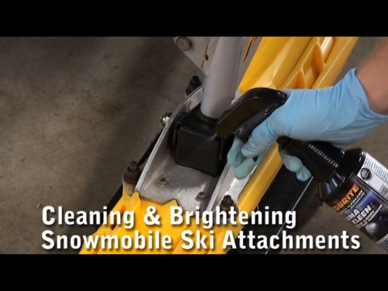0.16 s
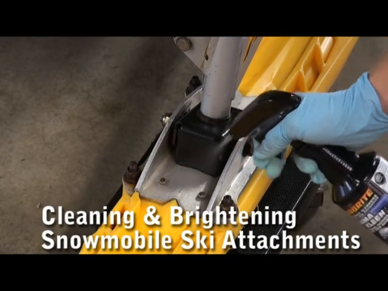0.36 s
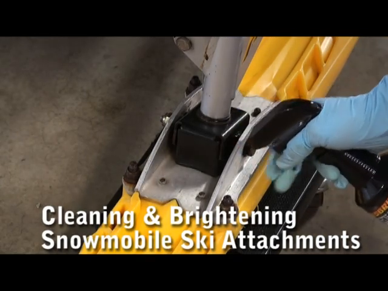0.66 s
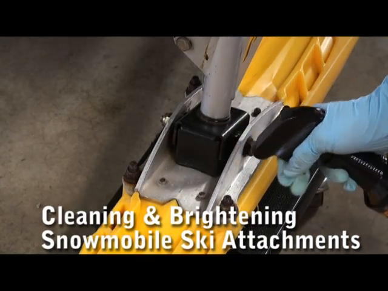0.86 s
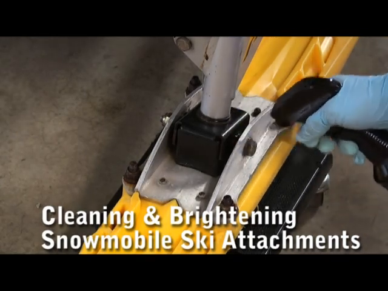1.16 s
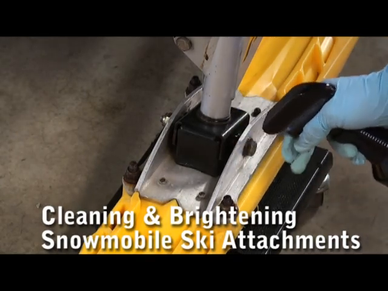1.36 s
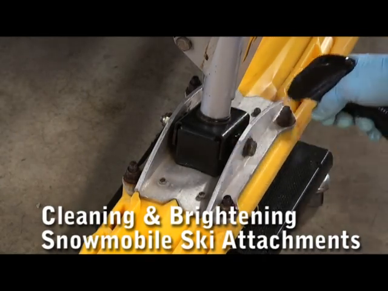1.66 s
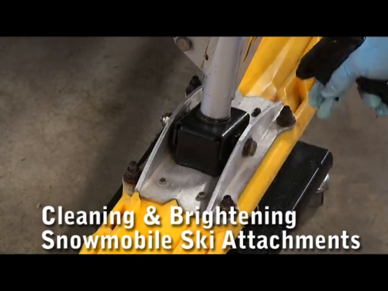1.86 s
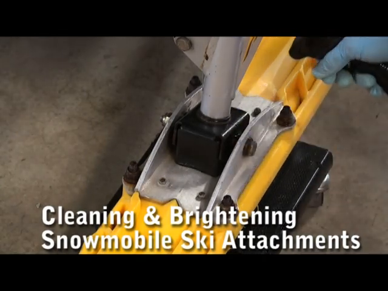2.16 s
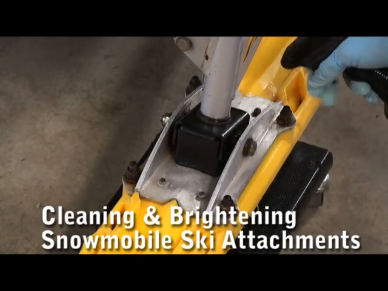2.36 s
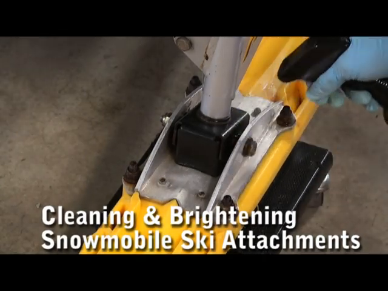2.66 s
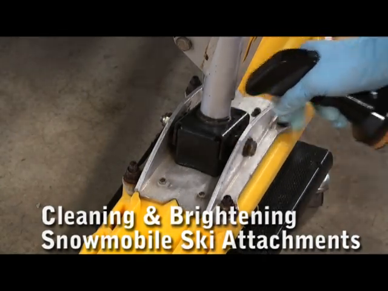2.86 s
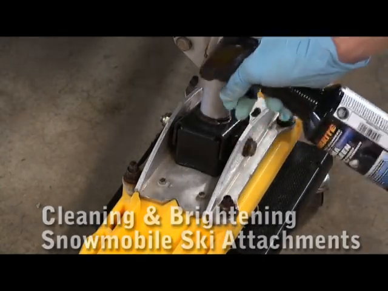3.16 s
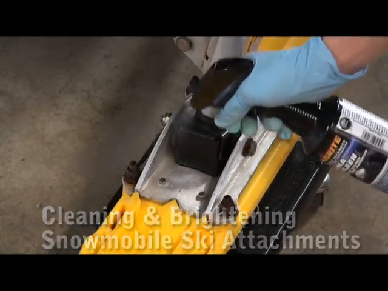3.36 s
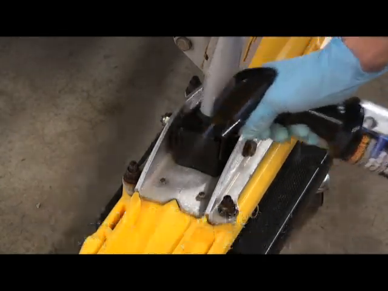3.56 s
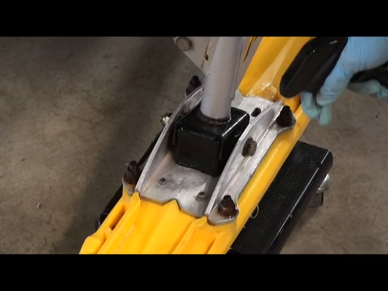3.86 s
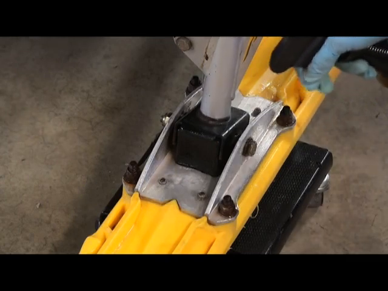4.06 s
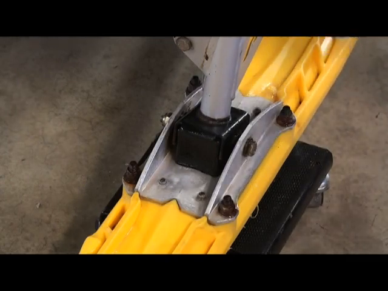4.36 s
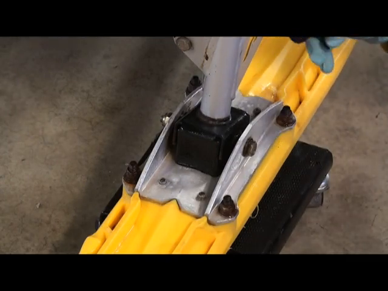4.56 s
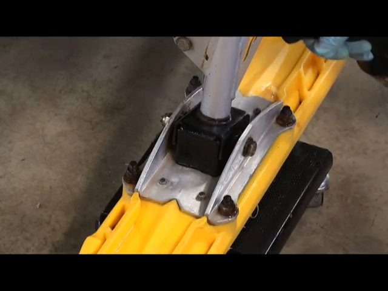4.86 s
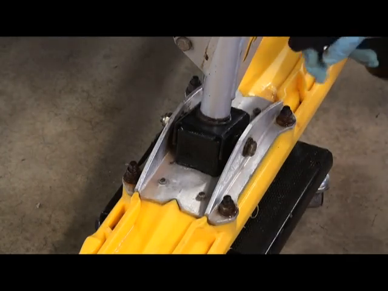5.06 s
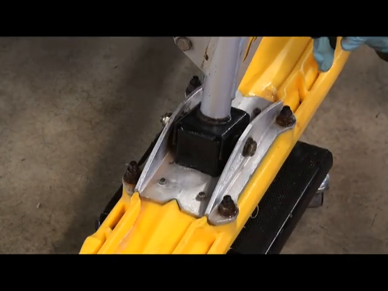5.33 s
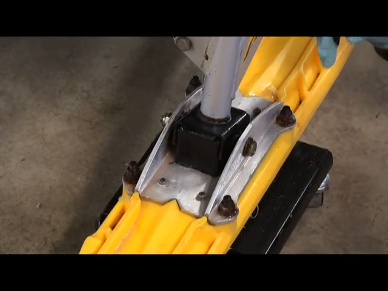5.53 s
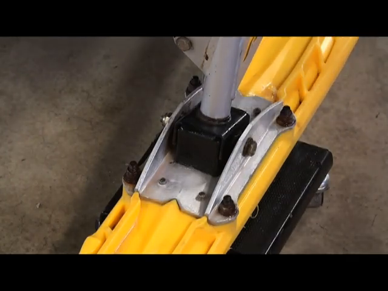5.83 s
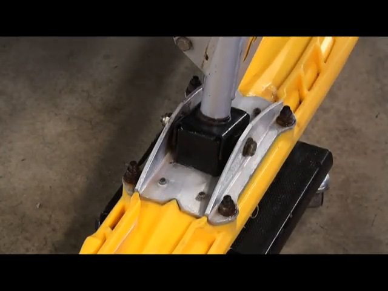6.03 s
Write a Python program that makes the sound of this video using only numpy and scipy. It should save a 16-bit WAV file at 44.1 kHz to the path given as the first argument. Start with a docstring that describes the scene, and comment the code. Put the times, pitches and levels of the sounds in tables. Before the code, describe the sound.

A trigger spray bottle is pumped close to the microphone in a quiet workshop. From the very start until about 5 seconds come nine short squeezes, roughly half a second to a second apart. Each is a bright, fizzing, slightly whistling hiss, with fine mist pattering on a metal part; the patter grows a little fuller from about 2 seconds. Between squeezes the nozzle spits and dribbles, the valve ticks and the plastic trigger knocks lightly, most often in the first three seconds. A soft bump comes near 4 seconds and a clearer dull, hollow thud at about 4.5 seconds. The last full spray falls near 4.9 seconds, and a few ticks and a fading hiss end by 5.5 seconds. A faint distant fan hum and a thin, very high electronic whine run throughout. The room adds a short echo.

```python
"""A trigger spray bottle is pumped close by in a workshop. Each squeeze drums mist on a metal part
while air and liquid fizz, whistle and spit through the nozzle; dribbles and hisses fall in between.
The valve ticks, the plastic trigger knocks, and a few dull blows thud on a hollow body.
Behind it a far fan hums and a camera's electronics whine at the top of the band.
The concrete floor and the room add a short echo."""
import sys
import numpy as np
from scipy import signal
from scipy.fft import rfft, irfft, next_fast_len
from scipy.io import wavfile
from scipy.ndimage import uniform_filter1d, map_coordinates

SR = 44100
rng = np.random.default_rng(int(sys.argv[2]) if len(sys.argv) > 2 else 0)


def store_pcm(level_fs):
    """Save levels as 16-bit WAV."""
    pcm = np.round(np.clip(level_fs, -1, 1) * 32767).astype(np.int16)
    wavfile.write(sys.argv[1], SR, np.atleast_2d(pcm).T)


N = 273111
T = np.arange(N) / SR
BURST_N = SR // 4  # samples in one tick, knock or thud


def amp(db):
    """Decibels to gain."""
    return 10 ** (np.asarray(db) / 20)


def unit(x):
    """Scale to rms 1."""
    return x / np.sqrt(np.mean(x ** 2) + 1e-20)


def curve_at(points, hz):
    """Read a curve of (freq_hz, value) points on a log frequency axis."""
    freqs, values = np.transpose(points)
    return np.interp(np.log(hz + 1), np.log(freqs + 1), values)


def wobble(rate_hz):
    """A smooth random curve with rate_hz knots a second."""
    return map_coordinates(rng.standard_normal(int(N * rate_hz / SR) + 4), [T * rate_hz])


def filtered(x, response):
    """Pass x through a complex frequency response."""
    size = next_fast_len(x.shape[-1] + 8192)
    return irfft(rfft(x, size) * response(np.fft.rfftfreq(size, 1 / SR)), size)[..., :x.shape[-1]]


def modes(table):
    """Response of resonances (pitch_hz, width_hz, level_db), summed with alternating polarity."""
    return lambda f: sum((-1) ** k * amp(db) * 1j * f * width / (hz * hz - f * f + 1j * f * width)
                         for k, (hz, width, db) in enumerate(table))


def patchy_noise(depth_db):
    """White noise with louder and softer patches across time and frequency."""
    spectrum = signal.stft(rng.standard_normal(N), nperseg=256)[2]
    patches = uniform_filter1d(rng.standard_normal(spectrum.shape), 5, axis=0)
    patches = uniform_filter1d(patches, 12, axis=1)
    return unit(signal.istft(spectrum * amp(depth_db * unit(patches)), nperseg=256)[1][:N])


def droplets(rate_hz, spread_db):
    """Single impacts at random moments, a few larger than the rest."""
    hits = rng.random(N) < rate_hz / SR
    size = np.minimum(rng.exponential(size=N), 3.5)
    return unit(hits * rng.choice([-1, 1], N) * amp(spread_db * size))


def add_burst(track, start_s, level_db, response, grain, t60_s, rise_s):
    """Mix in a grainy push that rises, dies away and rings through a response, peaking at level_db."""
    t = T[:BURST_N]
    push = (1 - np.exp(-t / rise_s)) * amp(-60 * t / t60_s) * grain
    ring = filtered(push, response)
    slot = track[round(start_s * SR):][:BURST_N]
    slot += amp(level_db) * ring[:len(slot)] / np.abs(ring).max()


# Tone of the fan and room air: freq_hz, relative_db
AIR_SPECTRUM = [(20, -15), (40, -14.5), (65, -8.5), (90, -15.5), (130, -11), (200, -16.5), (350, -10),
                (430, -13), (500, -13.5), (1200, -13.5), (2500, -15.5), (8000, -17.5), (12500, -23.5),
                (14000, -34), (16000, -16.5)]
# How alike the air is left and right: freq_hz, correlation
AIR_CORRELATION = [(30, 0.98), (80, 0.97), (130, 0.89), (290, 0.55), (600, 0.47), (1400, 0.32),
                   (3100, 0.69), (6800, 0.9), (15000, 0.55)]
def room_air():
    """A steady bed of fan rumble and room hiss, widest in the midrange."""
    def colour(hz):
        width_rad = np.arccos(np.clip(curve_at(AIR_CORRELATION, hz), -1, 1)) / 2
        return amp(curve_at(AIR_SPECTRUM, hz)) * [np.cos(width_rad), np.sin(width_rad)]
    noise = np.array([patchy_noise(depth_db=1.26), patchy_noise(depth_db=0.4)])
    mid, side = filtered(noise, colour)
    return amp(-54.5) * unit(np.array([mid + side, mid - side]))


def fan_hum(pitch_hz=90.2, level_db=-73.5):
    """The blade tone wavers a little in pitch and strength."""
    cycles = np.cumsum(pitch_hz + 1.44 * wobble(3.3)) / SR
    flutter_db = 2 * wobble(9)
    return amp(level_db + flutter_db) * np.sqrt(2) * np.sin(2 * np.pi * cycles)


# Whine partials: carrier_hz, sweep_rad, [(offset_beats, relative_db) for each tone in the cluster]
WHINE_TONES = [(15404.7, .45, [(-3, -83), (-2, -76), (-1, -68), (0, -64.5), (1, -68.5), (2, -78),
               (3, -85)]), (13666.0, 1.3, [(-5, -83), (-4, -80), (-2, -76), (-1, -74), (0, -69), (1, -83),
               (2, -84)]), (14385.4, .45, [(-1, -88), (0, -82), (1, -86)])]
def electronics_whine(beat_hz=59.947, beat_start_s=.0011):
    """High tones drift and flicker; locked side tones make them throb at the beat rate."""
    beat = 2 * np.pi * beat_hz * (T - beat_start_s)
    drift = 2 * np.pi * np.cumsum(0.79 * wobble(3.8)) / SR
    tones = 0
    for hz, sweep_rad, cluster in WHINE_TONES:
        tremble = .3 * (hz > 15000) * wobble(300)  # top carrier only
        carrier = 2 * np.pi * hz * T + drift + tremble
        for k, db in cluster:
            tones += amp(db) * np.sqrt(2) * np.cos(carrier + k * beat + sweep_rad * k * k)
    flicker_db = 0.77 * wobble(20)
    return tones * amp(flicker_db) * amp([[0], [2.8]])  # leans right


# Decay of the workshop: freq_hz, t60_s
ROOM_DECAY = [(200, 0.67), (1500, 0.14), (6000, 0.2), (14000, 0.081)]
def workshop_reverb(x, predelay_n=250):
    """A stereo room tail in which each frequency dies at its own speed."""
    hz, t, noise = signal.stft(rng.standard_normal((2, SR // 2)), SR, nperseg=256)
    decay = amp(-60 * t / curve_at(ROOM_DECAY, hz)[:, None])
    tail = signal.istft(noise * decay, SR, nperseg=256)[1]
    tail /= np.linalg.norm(tail[0])
    return signal.fftconvolve(np.pad(x, (predelay_n, 0))[None], tail, axes=1)[:, :N]


def floor_echo(x, left_s=0.0016, right_s=0.0033):
    """Hard concrete returns the treble best, reaching each side at its own time."""
    bright = filtered(x, lambda f: 1j * f / (7000 + 1j * f))
    return np.array([np.pad(bright, (round(delay_s * SR), 0))[:N] for delay_s in (left_s, right_s)])


# Lower and upper ring of the hollow body: pitch_hz, width_hz
BODY_MODES = [(450, 230), (1200, 410)]
# Blows and their bounces: start_s, level_db, upper_ring_db
BLOWS = [(3.986, -44, 1), (4.55, -28, 5), (4.5535, -34.5, 15), (4.559, -36, 17), (4.575, -38, 3),
         (4.582, -36, 9), (4.589, -41, 0), (6.147, -47.5, -9), (6.157, -44.5, 1)]
def thuds():
    """Very short, dull blows ring a hollow body."""
    track = np.zeros(N)
    lower, upper = BODY_MODES
    for start_s, level_db, upper_ring_db in BLOWS:
        body = modes([(*lower, 0), (*upper, upper_ring_db)])
        dulled = lambda f: body(f) / (1 + 1j * f / 2200)
        contact = rng.normal(1, 0.31, BURST_N)
        add_burst(track, start_s, level_db, dulled, contact, t60_s=.003, rise_s=.0001)
    return track


# Resonances of the plastic head: pitch_hz, width_hz
HEAD_MODES = [(1150, 200), (1750, 86), (2050, 380), (2550, 740)]
# Trigger knocks and rasps: start_s, level_db, pitch_hz, t60_s, rise_s
TRIGGER_KNOCKS = [(0.243, -49, 1760, 0.15, .002), (.737, -48, 2550, 0.029, 0.0009),
                  (.757, -45.5, 1100, 0.085, 0.00083), (0.849, -42.5, 2550, 0.035, .001),
                  (.859, -44, 2280, .04, 0.00092), (0.868, -52, 1750, 0.048, .002),
                  (.874, -45, 1700, 0.092, .001), (1.45, -51, 1750, 0.056, .001),
                  (1.599, -53, 1500, 0.041, .002), (1.998, -54, 2550, .04, .001),
                  (2.009, -47, 1290, 0.056, .002), (2.02, -44.5, 2230, 0.1, .015),
                  (2.462, -50.5, 2000, 0.041, .001), (2.568, -45, 1990, 0.071, .002),
                  (3.08, -48, 2000, .03, .001), (3.104, -48.5, 1260, .1, .012),
                  (3.722, -51, 2700, .04, .001), (5.23, -47.5, 1990, 0.065, .004)]
def trigger_knocks():
    """The trigger rattles the plastic head, each knock favouring the resonances near its own pitch."""
    track = np.zeros(N)
    for start_s, level_db, pitch_hz, t60_s, rise_s in TRIGGER_KNOCKS:
        head = modes([(hz, width, -9 * abs(np.log2(hz / pitch_hz))) for hz, width in HEAD_MODES])
        softened = lambda f: head(f) / (1 + (1j * f / 3500) ** 2 + 1.4j * f / 3500)
        slips = rng.standard_normal(BURST_N) ** 3  # uneven, spiky contact
        add_burst(track, start_s, level_db, softened, slips, t60_s, rise_s)
    return track


# Nozzle spits (long) and valve ticks (short): start_s, level_db, centre_hz, t60_s
SPITS_AND_TICKS = [(0.245, -46, 6000, .02), (.436, -42, 10800, .07), (.6235, -35, 12500, .03),
                   (.7524, -38, 7400, 0.02), (.835, -42, 8500, .04), (.939, -43, 11500, .08),
                   (.968, -43, 10500, .06), (0.992, -38, 8000, 0.081), (1.0495, -38, 11400, .09),
                   (1.34, -37.5, 5300, 0.025), (1.448, -54, 6600, .02), (1.484, -40.5, 10500, .05),
                   (1.523, -36, 11000, 0.033), (1.5544, -34, 11500, .04), (1.5772, -35, 7000, .03),
                   (1.6344, -35, 11500, .08), (2.4612, -39.5, 6400, 0.033), (2.605, -36, 10500, .12),
                   (2.6459, -35, 10000, .07), (2.6703, -38, 11500, .06), (2.965, -39.5, 5500, .025),
                   (3.0809, -45, 8500, .02), (3.152, -39, 11800, 0.093), (3.1882, -44, 10500, .04),
                   (3.2635, -41, 11000, .04), (3.456, -40, 9000, .04), (3.7002, -37.5, 6000, .03),
                   (3.913, -36.5, 11600, .05), (3.9868, -41, 11000, 0.082), (4.501, -40, 6600, 0.033),
                   (4.557, -37, 7960, .08), (4.69, -42, 11000, 0.11), (4.8035, -36, 8900, 0.053),
                   (4.967, -34, 6000, .03), (5.127, -40, 6960, 0.036), (5.221, -43, 8500, .06)]
def spits_and_ticks():
    """The nozzle and valve let out short, bright puffs of noise."""
    track = np.zeros(N)
    snap = 1 + .8 * np.exp(-T[:BURST_N] / .002)  # sharpens the attack
    for start_s, level_db, centre_hz, t60_s in SPITS_AND_TICKS:
        cavity = modes([(centre_hz, 1.1 * centre_hz, 0)])
        puff = snap * rng.standard_normal(BURST_N)
        add_burst(track, start_s, level_db, lambda f: cavity(f) ** 2, puff, t60_s, rise_s=.0001)
    return track


def swell(start_s, spans_s, levels_db):
    """Pump pressure ramps up from rest and back in straight lines; the sound follows its square."""
    times = start_s + np.cumsum([0, *np.abs(spans_s)])
    return np.interp(T, times, [0, *np.sqrt(amp(levels_db)), 0]) ** 2


# Squeezes: start_s, rise_s, hold_s, release_s, opening_db (relative to the peak),
# then the peaks: metal_db, hollow_db, whistle_db, fizz_db, sizzle_db
SQUEEZES = [(-.06, 0.065, 0.041, 0.18, 2.5, -64, -62.5, -49.5, -48.5, -57),
            (.43, 0.18, 0.042, 0.12, -4.5, -53, -57, -61, -57, -57),
            (0.964, 0.22, 0.054, 0.15, -9.5, -51.5, -56.5, -61.5, -50.5, -49),
            (1.468, 0.27, 0.062, .11, -12.5, -51, -54.5, -58, -54, -53.5),
            (2.048, .19, 0.093, 0.24, -13, -46.5, -52.5, -63, -54, -58),
            (2.605, 0.17, 0.083, .16, -11.5, -47.5, -53, -63, -55, -56.5),
            (3.242, .31, 0.029, 0.17, -9.5, -48, -52, -57.5, -52.5, -56),
            (4.152, 0.13, 0.11, 0.23, -10.5, -47.5, -52.5, -64, -56.5, -62),
            (4.776, 0.11, 0.14, 0.16, -6.5, -44.5, -51.5, -61, -51, -55)]
# Dribbles landing on the part: peak_s, rise_s, fall_s, metal_db, hollow_db
PART_DRIBBLES = [(.46, 0.057, .04, -58, -70), (.75, .012, 0.11, -54.5, -72), (.86, 0.025, .05, -67, -59),
                 (1.52, 0.047, .08, -62, -62), (1.92, .03, 0.059, -60, -80), (2.03, .04, 0.08, -60, -55),
                 (2.17, 0.087, .08, -67, -56), (2.59, 0.036, .04, -78, -61), (3.1, 0.028, 0.14, -81, -62),
                 (3.73, .07, .07, -58.5, -70), (3.83, 0.052, 0.085, -54, -58.5),
                 (3.91, 0.027, 0.039, -57, -60), (4.08, 0.29, 0.21, -58.5, -68),
                 (4.56, 0.034, 0.21, -54, -55.5), (4.74, 0.087, 0.16, -58, -67),
                 (5.13, .022, 0.26, -58.5, -61)]
# Air alone hissing through the nozzle: peak_s, rise_s, fall_s, whistle_db, fizz_db, sizzle_db
NOZZLE_HISSES = [(.24, .05, .07, -67, -80, -70), (.46, 0.074, 0.089, -51, -53, -53),
                 (.75, .012, 0.12, -59, -71, -64), (.86, .03, 0.063, -59, -61, -62),
                 (.96, 0.078, 0.13, -72, -66, -55), (1.57, .08, 0.088, -62, -54, -57),
                 (1.65, .03, 0.2, -68, -45, -59), (2.03, .04, .05, -67, -57, -64),
                 (2.62, 0.034, 0.22, -72, -59, -50), (2.97, .05, .1, -63, -71, -67),
                 (3.154, .004, .05, -64, -64, -48.5), (3.21, 0.046, 0.3, -61, -60, -55),
                 (3.64, 0.17, 0.1, -65, -49.5, -51), (3.74, 0.066, .16, -61, -77, -65),
                 (3.94, .05, 0.11, -70, -72, -58), (4.03, 0.068, 0.077, -64, -61, -53),
                 (4.13, 0.066, 0.12, -58, -55, -55), (4.45, .08, 0.13, -65, -67, -63),
                 (4.56, 0.028, 0.2, -54, -63, -60), (4.74, 0.1, 0.18, -66, -59, -54.5),
                 (4.806, .004, .06, -56, -61, -49), (5.13, .022, 0.34, -57, -70, -66)]
def pump_envelopes(valve_open_s=0.025, whistle_lag_s=0.044):
    """Gains of the five spray layers; squeezes, dribbles and hisses add in power."""
    power = np.zeros((5, N))
    for start_s, rise_s, hold_s, release_s, opening_db, *peaks_db in SQUEEZES:
        spans_s = [valve_open_s, rise_s - valve_open_s, hold_s, release_s]
        flow = swell(start_s, spans_s, [opening_db, 0, 0])
        late = swell(start_s + whistle_lag_s, spans_s, [opening_db, 0, 0])  # as the chamber empties
        power += (amp(peaks_db)[:, None] * [flow, flow, late, flow, flow]) ** 2
    for cues, layers in ((PART_DRIBBLES, slice(0, 2)), (NOZZLE_HISSES, slice(2, 5))):
        for peak_s, rise_s, fall_s, *peaks_db in cues:
            flow = swell(peak_s - rise_s, [rise_s, fall_s], [0])
            power[layers] += (amp(peaks_db)[:, None] * flow) ** 2
    return np.sqrt(power)


# Nozzle cavity resonances, low to high, each with a weaker neighbour: pitch_hz, width_hz, level_db
WHISTLE_MODES = [(7150, 1900, 10), (5770, 8500, -9.5)]
FIZZ_MODES = [(9130, 2850, 2), (10900, 5600, 0)]
SIZZLE_MODES = [(11070, 2050, 14), (12300, 14000, 1)]
def nozzle_jet(gains):
    """Air and liquid rush through the nozzle cavity and make it whistle, fizz and sizzle."""
    sputter = amp(1.15 * wobble(120) + 0.15 * wobble(21))  # slugs of liquid interrupt the jet
    jet = sputter * (patchy_noise(depth_db=1.5) + .5 * droplets(rate_hz=1500, spread_db=2.5))
    voices = (WHISTLE_MODES, FIZZ_MODES, SIZZLE_MODES)
    return sum(gain * unit(filtered(jet, modes(voice))) for gain, voice in zip(gains, voices))


# Tone of mist on bare metal: freq_hz, relative_db
MIST_SPECTRUM = [(700, -33), (1500, -18), (2200, -4), (3000, 0), (4000, 0), (7400, -4), (9000, -5),
                 (12000, -3), (20000, -58)]
# Resonances of the part's hollow channel: pitch_hz, width_hz, level_db
CHANNEL_MODES = [(933, 470, -0.5), (1286, 360, 5.5), (1780, 860, -0.5)]
def mist_on_part(metal_gain, hollow_gain):
    """Fine droplets drum on bare metal and ring the hollow of the part."""
    landing = patchy_noise(depth_db=1.0) + 0.45 * droplets(rate_hz=2500, spread_db=2.0)
    metal = unit(filtered(landing, lambda f: amp(curve_at(MIST_SPECTRUM, f))))
    hollow = unit(filtered(landing, modes(CHANNEL_MODES)))
    flutter = amp(0.87 * wobble(25.06))
    return flutter * (metal_gain * metal + hollow_gain * hollow)


def spray():
    """The pump drives both the mist on the part and the jet in the nozzle."""
    metal_gain, hollow_gain, *nozzle_gains = pump_envelopes()
    return mist_on_part(metal_gain, hollow_gain) + nozzle_jet(nozzle_gains)


def scene():
    """The bottle up front and the thuds wetter, over the steady room bed."""
    bottle = spray() + spits_and_ticks() + trigger_knocks()
    blows = thuds()
    direct = (bottle + blows) * amp([[-.2], [.2]])
    echo = amp(-18.5) * floor_echo(bottle)
    reverb = amp(-11) * workshop_reverb(bottle) + amp(-7) * workshop_reverb(blows)
    return direct + echo + reverb + room_air() + fan_hum() + electronics_whine()


def record(dry):
    """A steep high cut: the treble fades just under the band limit, with nothing above."""
    roll_hz, limit_hz = 15600, 15780
    fade_db = lambda hz: -35 * np.clip((hz - roll_hz) / (limit_hz - roll_hz), 0, 1) ** 2
    return filtered(dry, lambda hz: amp(fade_db(hz)) * (hz < limit_hz))


dry = scene()
out = record(dry)
store_pcm(out)
```